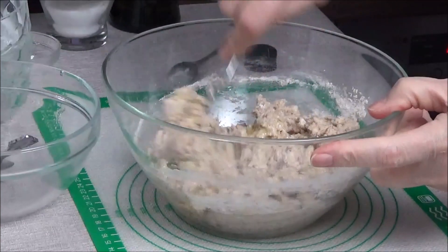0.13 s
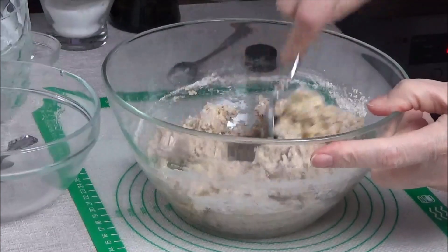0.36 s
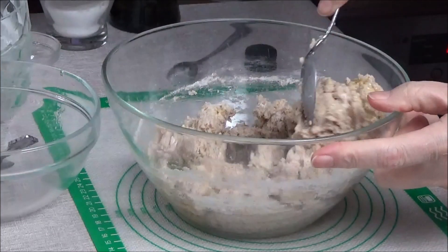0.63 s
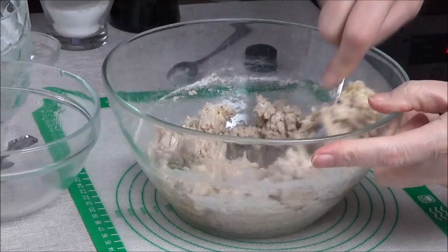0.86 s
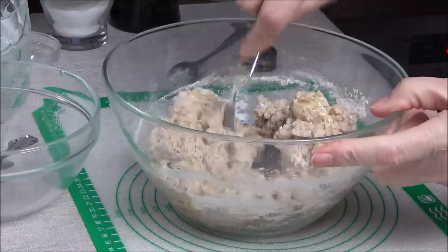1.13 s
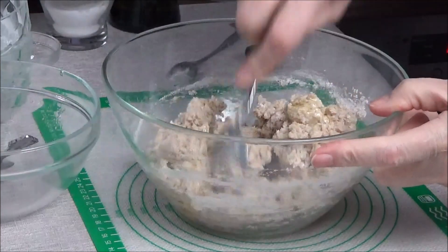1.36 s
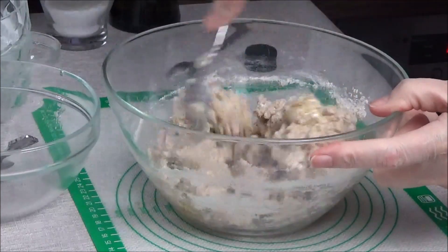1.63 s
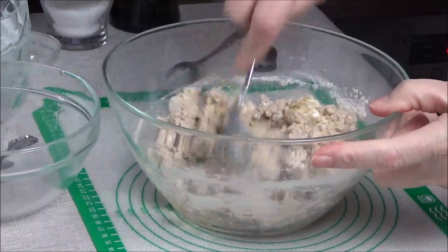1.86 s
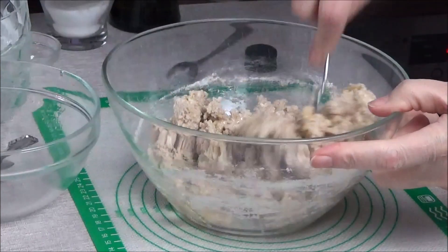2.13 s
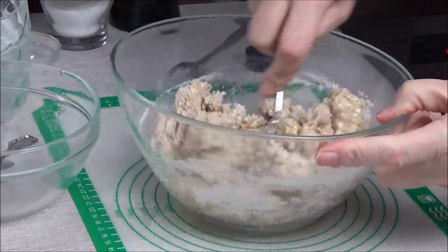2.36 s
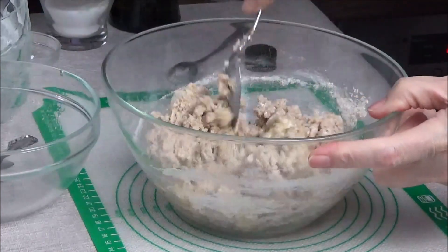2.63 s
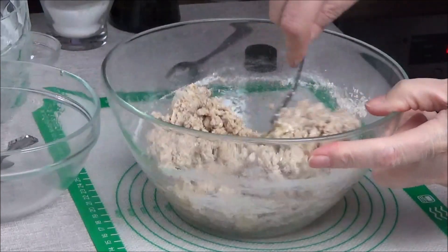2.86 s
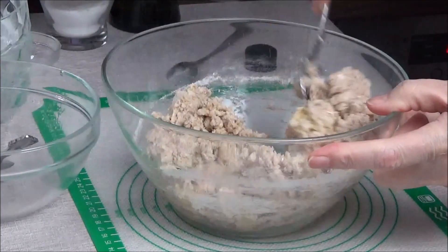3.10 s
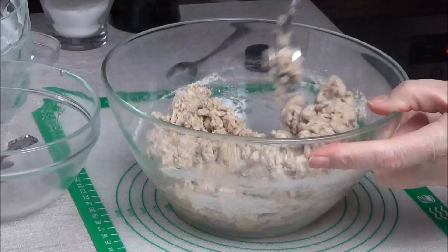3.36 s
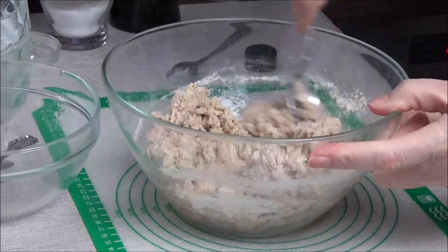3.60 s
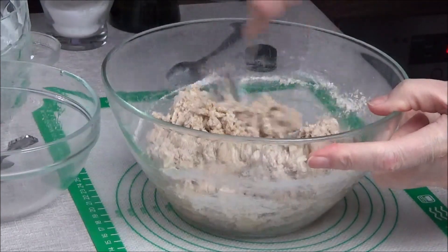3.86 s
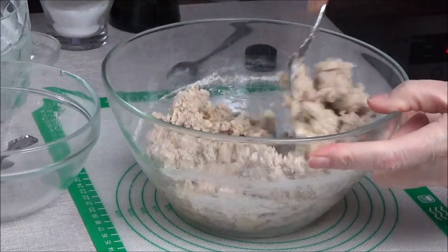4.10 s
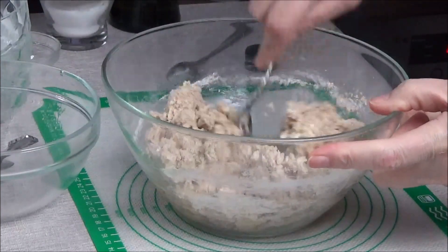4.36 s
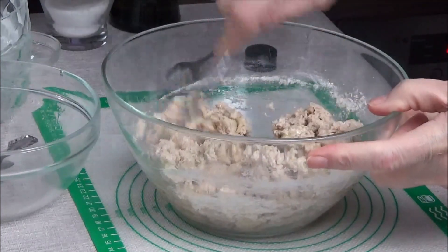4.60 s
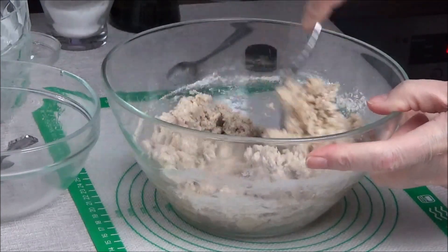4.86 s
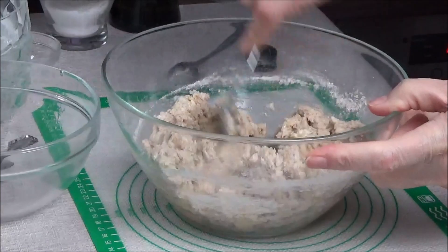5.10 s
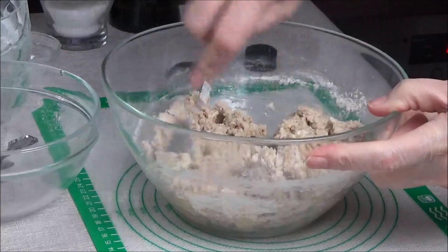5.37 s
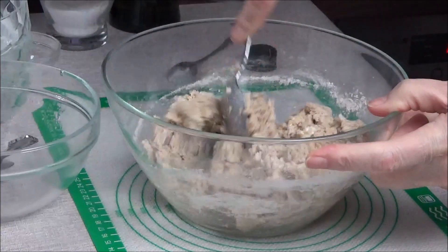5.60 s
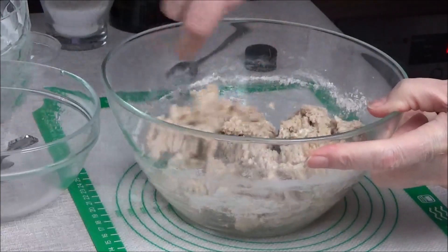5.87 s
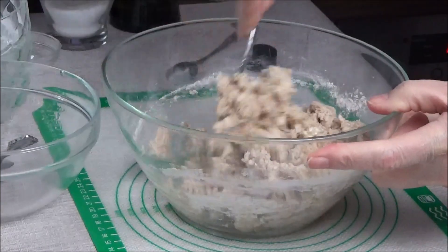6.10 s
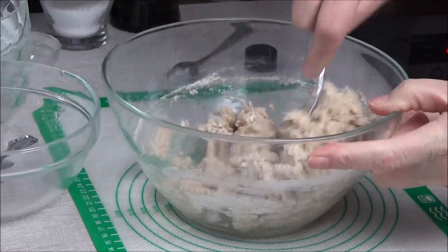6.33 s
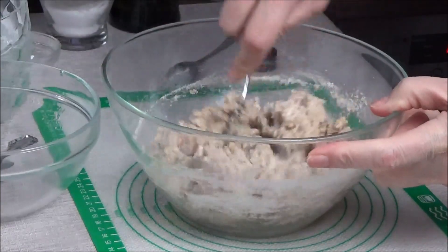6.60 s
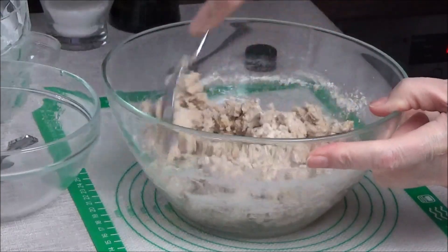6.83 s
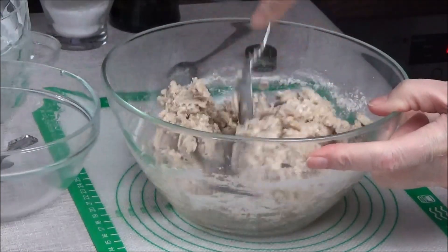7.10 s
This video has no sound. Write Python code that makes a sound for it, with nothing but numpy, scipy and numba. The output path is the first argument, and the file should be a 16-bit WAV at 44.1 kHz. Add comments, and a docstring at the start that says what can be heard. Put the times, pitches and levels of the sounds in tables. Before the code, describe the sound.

A metal spoon knocks unevenly against a glass bowl while stirring stiff dough, with short damped clinks, soft rubbing and sticky rustling in a kitchen.

```python
"""A metal spoon stirs stiff dough in a glass bowl on a kitchen counter, a metre from a small camera.
From the start there is soft filtered-noise hush, rustling and smacking dough, the spoon rubbing the glass,
and a faint decaying ping once a camera frame. From 0.15 s to 6.9 s, 25 uneven knocks each crack with noise,
thud through the counter and ring bowl and spoon as fading sines, damped by the dough. A noise echo
answers the bowl, and the camera turns down under loud sound; stirring goes on to the end at 7.2 s."""
import sys
import numpy as np
from scipy import signal
from scipy.fft import rfft, irfft, next_fast_len
from scipy.io import wavfile
from scipy.ndimage import uniform_filter1d
from numba import njit

SR = 44100
rng = np.random.default_rng(int(sys.argv[2]) if len(sys.argv) > 2 else 0)


def how_loud(loudness_db):
    """Turn decibels into a plain amplitude multiplier (0 dB gives 1, 20 dB gives 10)."""
    steps = np.asarray(loudness_db, float) / 20
    return 10 ** steps


def transcribe(u):
    """Save the signal u as a 16-bit wav file named by the first command-line argument.

    u: samples, shape (n,) or (channels, n), limited to [-1, 1]; the rate is SR.
    q: integer samples, one column per channel.
    """
    v = np.clip(np.atleast_2d(u).T, -1, 1)
    q = np.round(v * 32767).astype(np.int16)
    wavfile.write(sys.argv[1], SR, q)


N = 318402  # length in samples
TOP_HZ = 10877  # highest pitch let through

# knocks of spoon on glass: (time [s], ring level [dB], bowl over spoon [dB], weight into the dough [dB],
# pitch the struck spot favours [Hz], lift of that pitch [dB], freedom from dough [factor on ring time])
KNOCKS = [(0.1474, -24.5, -5.5, -34, 3370, 10.5, 0.397), (0.2245, -35.5, -6, -41, 4260, 12, 0.523),
          (0.839, -30.5, -3, -40.5, 6230, 10, 0.9), (0.9773, -53, -1.5, -46, 3800, 14, 0.36),
          (1.0105, -44, -6, -50.5, 7172, 5.5, 0.597), (1.345, -29.5, -6.5, -41.5, 3140, 8.5, 0.504),
          (1.3965, -27.5, -8, -36.5, 2700, 12, 0.7), (1.6635, -32, 10, -32.5, 4432, 7, 0.4),
          (2.141, -33, -4, -32.5, 6088, 7, 0.514), (2.3345, -55.5, -11.5, -54.5, 2860, 1.5, 0.83),
          (2.3598, -55, -12, -59.5, 4010, 10.5, 0.68), (2.6796, -30, 4, -26.5, 7410, 10, 1.174),
          (2.7856, -32, -6.5, -34, 3800, 5.5, 0.455), (3.1168, -56.5, 13, -37, 860, 12.5, 0.56),
          (3.458, -24.5, 8, -33, 4432, 2, 2.31), (3.8729, -25.5, -11, -34.5, 7172, 3.5, 0.5),
          (4.2252, -30, -18, -28.5, 7172, 4.5, 0.527), (4.6143, -29.5, -3, -38, 4010, 6, 0.442),
          (4.9334, -29.5, -17, -25.5, 3800, 7.5, 0.647), (5.3312, -30, -7, -41, 3140, 3.5, 0.659),
          (5.4128, -34.5, -3, -34.5, 6550, 10, 0.69), (5.7041, -26.5, -5, -41, 6780, 8, 0.89),
          (5.8589, -59, 14.5, -47, 420, 4, 0.58), (5.899, -65, -1, -51, 640, 8, 0.42),
          (6.8608, -29, -1.5, -40.5, 7172, 3.5, 0.362)]


def curve(table, hz):
    """Read (pitch [Hz], value) points on a log-frequency axis."""
    f, v = np.transpose(table)
    return np.interp(np.log(hz + 1), np.log(f), v)


def colour(table, x):
    """Shape a signal's spectrum by (pitch [Hz], level [dB]) points, to rms 1."""
    size = next_fast_len(N)
    gain = how_loud(curve(table, np.fft.rfftfreq(size, 1 / SR)))
    y = irfft(rfft(x, size) * gain, size)[..., :N]
    return y / np.std(y, axis=-1, keepdims=True)


def add(out, s, piece):
    """Mix a piece in from time s."""
    i = int(s * SR)
    out[i:i + len(piece)] += piece[:N - i]


def ring(modes, lift_db, phase, rise_s, length_s=0.3):
    """A struck body sounds as fading sines, each with its own lift and phase (in turns)."""
    hz, db, t60 = np.transpose(modes)[:, :, None]
    t = np.arange(int(SR * length_s)) / SR
    fade = np.exp(-np.log(1000) * t / t60)
    waves = fade * np.sin(2 * np.pi * (hz * t + phase[:, None]))
    rise = 1 - np.exp(-t / rise_s)
    return (how_loud(db + lift_db[:, None]) * waves).sum(axis=0) * rise


def burst(hz, width, decay_s):
    """A fast-dying noise snap around hz, peak 1; width is the factor from centre to band edge."""
    t = np.arange(int(SR * 0.03)) / SR
    edges = [hz / width, min(hz * width, TOP_HZ)]
    band = signal.butter(1, edges, "band", fs=SR, output="sos")
    y = signal.sosfilt(band, rng.standard_normal(len(t)) * np.exp(-t / decay_s))
    return y / np.abs(y).max()


def walk(rate):
    """A smooth random wander with a new target every 1 / rate seconds; typical spread about 1.3."""
    k = int(SR / rate)
    held = rng.standard_normal(N)[np.arange(N) // k]
    return 1.8 * uniform_filter1d(uniform_filter1d(held, k), k)


def hush():
    """Steady room tone and microphone hiss: filtered noise, most alike on both sides in the bass."""
    # room noise spectrum: (pitch [Hz], relative level per Hz [dB])
    hush_spectrum = [(20, -9.5), (60, -4.5), (150, -2), (300, -4), (700, -5.5), (1500, -8), (3000, -11.5),
                     (6000, -16.5), (11000, -22)]
    # likeness of the two sides: (pitch [Hz], left-right correlation [0 to 1])
    likeness = [(60, 0.9), (200, 0.93), (500, 0.46), (1200, 0.71), (3000, .7), (9000, 0.6)]
    size = next_fast_len(N)
    hz = np.fft.rfftfreq(size, 1 / SR)
    alike = np.clip(curve(likeness, hz), 0, 1)
    shares = np.sqrt(np.array([1 + alike, 1 - alike]) / 2)
    spectrum = rfft(rng.standard_normal((2, size))) * how_loud(curve(hush_spectrum, hz)) * shares
    mid, side = irfft(spectrum, size)[:, :N]
    both = np.array([mid + side, mid - side])
    return how_loud(-66) * both / np.std(both)


def effort():
    """Levels (dB) of rub and rustle: each stroke swells and fades evenly, and one leads into every knock."""
    # strokes through the dough: (peak time [s], time to fall 10 dB [s],
    # spoon rubbing the glass [dB], dough rustle [dB])
    strokes = [(0.13, 0.1739, -66, -61.5), (.5, 0.69, -81.5, -68), (.79, 0.06, -57.5, -62.5),
               (1.0, 0.1016, -63, -55.5), (1.85, 0.2964, -74, -64.5), (2.12, 0.01, -65, -64.5),
               (2.27, 0.06, -58.5, -63), (2.5, 0.2076, -72, -63.5), (3.1, 0.01, -84.5, -60.5),
               (3.198, .022, -80, -52), (3.84, 0.1, -65.5, -61), (4.58, 0.2, -69.5, -61),
               (4.74, 0.0861, -69, -62.5), (4.795, 0.0035, -57.5, -77.5), (5.55, 0.12, -85.5, -66),
               (5.95, 0.18, -73, -65), (6.2, 0.19, -84, -64.5), (6.4, 0.01, -69, -78),
               (6.46, .03, -76, -65), (6.66, 0.18, -88.5, -68), (6.79, 0.0166, -57.5, -79.5),
               (7.0, 0.32, -83, -68.5)]
    lead_s, lead_rub_db, lead_rustle_db = 0.064, -49.5, -39  # levels are relative to the knock's ring
    still_db = (-86, -76)  # rub and rustle between strokes
    swell_shape = 1.335  # 1 = pointed, 2 = round
    t = np.arange(0, N / SR + 0.005, 0.005)
    # the spoon ploughs into the dough ahead of each knock
    leads = [(k[0], lead_s, k[1] + lead_rub_db, k[1] + lead_rustle_db) for k in KNOCKS]
    s, fall_s, *peaks = np.transpose(strokes + leads)[:, :, None]
    fade_db = -10 * (np.abs(t - s) / fall_s) ** swell_shape
    levels = []
    for peak_db, still in zip(peaks, still_db):
        power = how_loud(2 * still) + how_loud(2 * (peak_db + fade_db)).sum(axis=0)
        levels.append(np.interp(np.arange(N) / SR, t, 10 * np.log10(power)))
    return levels


def stirring():
    """Friction noise makes the loaded glass hum; crumbs rustle in small uneven grains."""
    # dough-laden glass under the sliding spoon: (pitch [Hz], level [dB])
    rub_tones = [(820, 15), (1180, 5), (1800, 7)]
    # rustle spectrum: (pitch [Hz], relative level per Hz [dB])
    rustle_spectrum = [(300, -45), (1200, -22), (2500, -1), (4000, 0.5), (6000, 2), (9000, 2), (11000, -7)]
    rub_db, rustle_db = effort()
    slip = rng.standard_normal(N) * how_loud(2.85 * walk(60))
    rub = 1.2 * colour([(200, -16), (500, -1.5), (1200, -1.5), (2500, -7.5), (5000, -14.5)], slip)
    press_db = 1.24 * (rub_db + 65.5)  # a harder rub sets the glass itself singing
    for hz, db in rub_tones:
        tone = signal.lfilter(*signal.iirpeak(hz, 16.0, fs=SR), slip)
        rub = rub + how_loud(press_db + db) * tone
    # about 250 stronger grains a second on top of steady noise
    grains = (rng.random(N) < 250 / SR) * rng.standard_normal(N)
    crumbs = rng.standard_normal(N) + grains * how_loud(2.39 * rng.exponential(size=N) + 15.0)
    rustle = how_loud(rustle_db + 2.0 * walk(25)) * colour(rustle_spectrum, crumbs)
    return how_loud(rub_db) * rub / np.std(rub) + rustle


def smacks():
    """Sticky dough lets go: a noise tick with a short low plop."""
    # small smacks: (time [s], tick peak [dB], tick centre [Hz], plop relative to tick [dB])
    dough_smacks = [(0.0106, -44, 2890, -11.5), (0.7599, -51, 1800, -9.5), (0.788, -53, 1760, -23.5),
                    (1.8504, -57, 3390, -19), (2.015, -48.5, 5860, -11.5), (2.032, -43, 2014, -16.5),
                    (2.2695, -44.5, 6540, -23.5), (2.4942, -57, 2070, -2), (3.0875, -59, 3480, -8.5),
                    (5.9757, -52, 3333, -30), (6.2352, -54, 8980, -28.5), (6.2725, -53.5, 6500, -21.5),
                    (6.4088, -55.5, 1830, -24)]
    out = np.zeros(N)
    for s, db, hz, plop_db in dough_smacks:
        tick = burst(hz, 1.15, 0.0033)
        plop = how_loud(plop_db) * burst(330, 1.12, 0.0074)
        add(out, s, how_loud(db) * (tick + plop))
    return out


def camera():
    """A faint ping inside the camera on every frame: one fading sine of uneven strength."""
    frame_rate, first_s = 25, 0.0113  # frames per second, first ping
    ping_hz, ping_db, ping_t60_s = 3480, -50, 0.02206  # level is that of the strongest ping
    out = np.zeros(N)
    times = np.arange(first_s, N / SR, 1 / frame_rate)
    for s, chance in zip(times, rng.random((len(times), 2, 1))):
        add(out, s, ring([(ping_hz, ping_db, ping_t60_s)], -9.0 * chance[0], chance[1], 0.001, 0.03))
    return out


def blows():
    """Every knock: crack of the contact, then glass, steel, dough and counter ring out."""
    # ways each body rings, one table a body: (pitch [Hz], relative level [dB], time to fall 60 dB [s]); each
    # knock then shifts every level and pitch, and for glass and steel also the time
    counter_modes = [(70, -14.5, 0.13), (129.7, -4.5, 0.087), (160.3, -0.5, 0.0906), (205.2, 2.5, 0.0494),
                     (282.6, -10, 0.025)]
    dough_modes = [(420, -7, 0.0174), (640, -1, 0.0191), (806.2, 0.5, 0.01306), (1170.2, 2.5, 0.0186),
                   (1759.4, 2, .012)]
    bowl_modes = [(860, -15, 0.088), (1531.7, -11.5, 0.056), (2350.7, -5.5, 0.07), (2416.8, -6.5, 0.08),
                  (3340.5, 0.5, 0.0549), (4432, 2.5, 0.056), (5697, -0.5, 0.026), (6088, 5.5, 0.03),
                  (7410, -3, 0.04), (8580, 3, 0.02), (9890, 2.5, 0.016), (10900, -21, 0.017)]
    spoon_modes = [(2860, -3.5, 0.024), (3140, 4, 0.01946), (3800, 5, 0.045), (4010, -4, 0.06),
                   (4260, -2, .03), (6230, 10.5, 0.0238), (6550, 3.5, 0.0504), (7172, 5.5, 0.0417),
                   (8072, 3.5, 0.021), (9472, -2.5, 0.064)]
    crack_over_ring_db, crack_over_weight_db = 14.5, -5.5
    crack_mid_hz, crack_db_per_octave = 4300, 24  # the crack dulls as weight outgrows ring
    thud_top_db, thud_full_db, thud_slope = -45.5, -38, 1.46  # thud grows with weight up to a ceiling
    # lighter knocks lose this many dB per octave above 3 kHz for each dB less
    soft_from_db, soft_tilt = -33.5, 0.0796
    spot_width = 0.0948  # reach of the favoured pitch, in log frequency
    splash_db, splash_share, splash_spread = 2.5, 0.207, 0.0318  # level, share of ring time, pitch scatter
    out = np.zeros(N)
    bodies = (counter_modes, dough_modes, bowl_modes, spoon_modes)
    sizes = [len(b) for b in bodies]
    hard = sizes[0] + sizes[1]  # glass and steel start here
    for s, ring_db, glass_db, weight_db, spot_hz, spot_db, free in KNOCKS:
        hz, db, t60 = np.concatenate(bodies).T
        scatter, detune, stray, uneven = rng.standard_normal((4, len(hz)))
        crack = np.hypot(how_loud(ring_db + crack_over_ring_db), how_loud(weight_db + crack_over_weight_db))
        crack_hz = crack_mid_hz * 2 ** ((ring_db - weight_db) / crack_db_per_octave)
        thud_db = thud_top_db + thud_slope * min(weight_db - thud_full_db, 0)
        bowl_db = ring_db + min(glass_db, 0)
        spoon_db = ring_db - max(glass_db, 0)
        lift_db = np.repeat([thud_db, weight_db, bowl_db, spoon_db], sizes)
        # the struck spot lies near the belly of some modes; chance shares out the rest
        favour = np.exp(-(np.log(hz / spot_hz) / spot_width) ** 2)
        lift_db = lift_db + spot_db * favour + 2.184 * scatter
        octaves_up = np.maximum(np.log2(hz / 3000), 0)
        lift_db = lift_db + soft_tilt * min(ring_db - soft_from_db, 0) * octaves_up
        # clinging dough changes the ring time of glass and steel, mostly shortening it
        t60 = t60 * np.repeat([1, 1, free, free], sizes)
        # every pitch strays slightly, more so the less free the knock
        hz = hz * (1 + 0.00292 / free * detune)
        add(out, s, crack * burst(crack_hz, 4.99, 0.001162))
        # the spoon chatters on the glass for a moment: a longer, softer spray with the crack
        add(out, s, crack * how_loud(-8.5) * burst(crack_hz, 2.64, 0.00747))
        add(out, s, ring(np.c_[hz, db, t60], lift_db, rng.random(len(hz)), 0.000397))
        # glass and steel rings open with a louder, briefer, off-pitch neighbour
        splash_hz = hz * (1 + splash_spread * stray)
        splash = np.c_[splash_hz, db + splash_db + 1.5 * uneven, t60 * splash_share]
        add(out, s, ring(splash[hard:], lift_db[hard:], rng.random(len(hz) - hard), 0.000296, 0.15))
    return out


def kitchen(x):
    """Diffuse echo of tiles and cupboards: noise whose octaves die at their own rates, unlike left and right."""
    # echo by octave: (centre [Hz], time to fall 60 dB [s], relative level [dB],
    # left-right difference against the common part [dB])
    echo_octaves = [(59.7, 0.7, 3.5, -16.5), (125, 0.33, -2.5, -27), (239, 0.346, 7, -22),
                    (492.5, 0.425, -2.5, -20), (946.7, 0.3548, 2.5, -11.5), (1906, 0.4033, 2.5, -9.5),
                    (3997, 0.346, -4, -9.5), (7372, 0.297, -5.5, -9)]
    first_echo_s = 0.001312  # the echo fades in from here over the same time again
    t = np.arange(int(SR * 0.55)) / SR
    tail = 0
    for hz, t60, db, side_db in echo_octaves:
        band = signal.butter(2, [hz / np.sqrt(2), hz * np.sqrt(2)], "band", fs=SR, output="sos")
        mid, side = signal.sosfilt(band, rng.standard_normal((2, len(t))))
        fade = np.exp(-np.log(1000) * t / t60) * np.sqrt(4 * np.log(1000) / t60 / SR)
        both = mid + how_loud(side_db) * side * np.array([[1], [-1]])
        tail = tail + how_loud(db) * fade * both
    tail = tail * np.clip(t / first_echo_s - 1, 0, 1)
    return how_loud(-2.5) * signal.fftconvolve(x[None], tail, axes=1)[:, :N]


def scene():
    """The bowl's sound stands in the middle; the kitchen's echo spreads to both sides."""
    bowl = stirring() + smacks() + blows()
    return hush() + camera() + bowl + kitchen(bowl)


@njit
def follow(x, attack, release):
    """Peak follower: quick to rise, slow to fall."""
    out, e = np.empty(len(x)), 0.
    for i in range(len(x)):
        e += (x[i] - e) * (attack if x[i] > e else release)
        out[i] = e
    return out


def roll_off(x):
    """The treble ends steeply here."""
    return signal.sosfilt(signal.butter(12, 11990, fs=SR, output="sos"), x)


def record(dry):
    """The camera's gain control ducks under loud sound and recovers; peaks are rounded, the top is cut."""
    ceiling = 0.2457  # peaks bend towards this amplitude
    peak = follow(np.abs(dry).max(axis=0), 1 / (0.0008 * SR), 1 / (0.12 * SR))  # rise, fall times in s
    # above -17 dB, each further dB of peak is turned down by 0.27 dB
    x = dry * np.minimum(1, how_loud(-17.0) / (peak + 1e-9)) ** 0.27
    top = signal.ellip(10, 0.5, 70, TOP_HZ, fs=SR, output="sos")
    mix = signal.sosfilt(top, ceiling * np.tanh(x / ceiling))
    return roll_off(mix)


dry = scene()
out = record(dry)
transcribe(out)
```